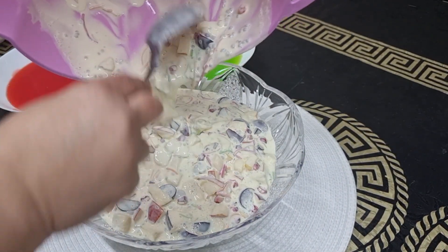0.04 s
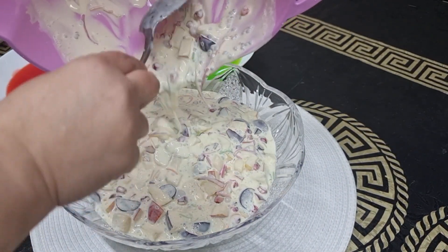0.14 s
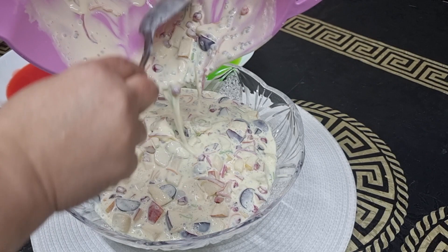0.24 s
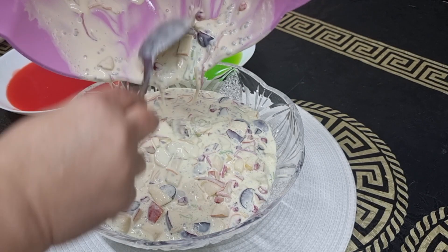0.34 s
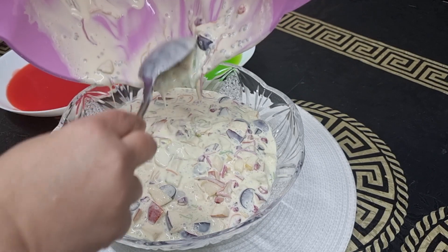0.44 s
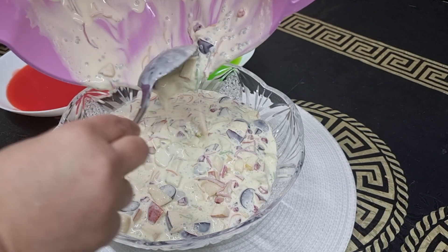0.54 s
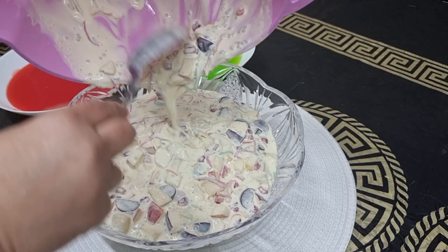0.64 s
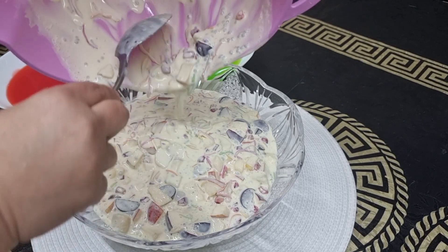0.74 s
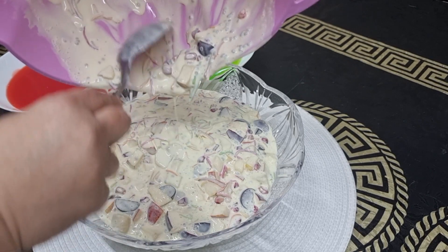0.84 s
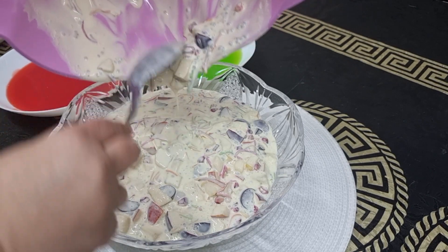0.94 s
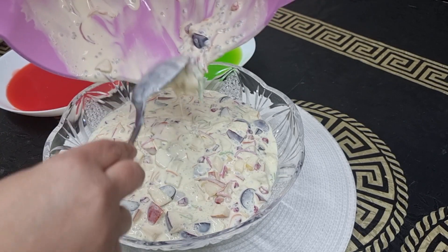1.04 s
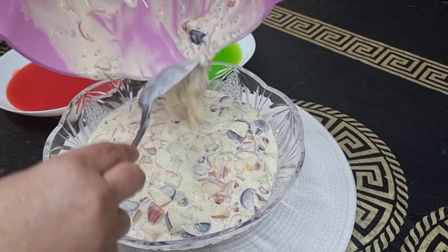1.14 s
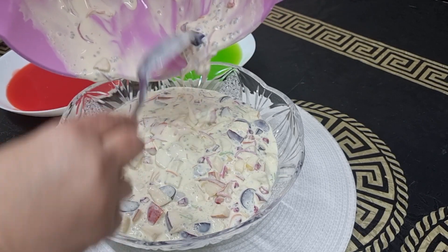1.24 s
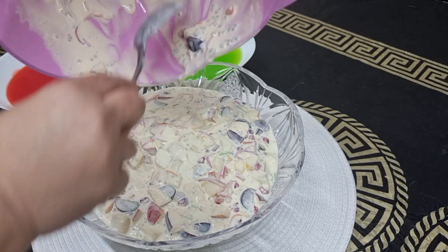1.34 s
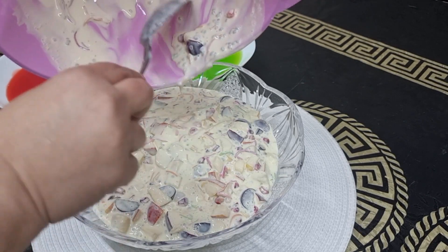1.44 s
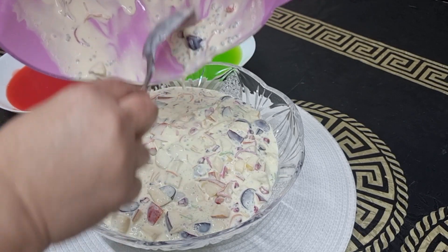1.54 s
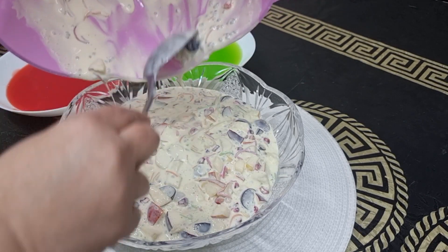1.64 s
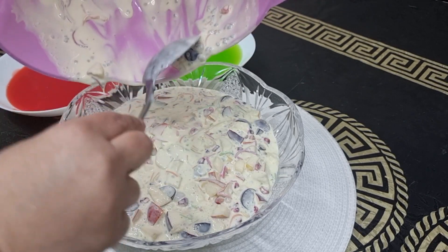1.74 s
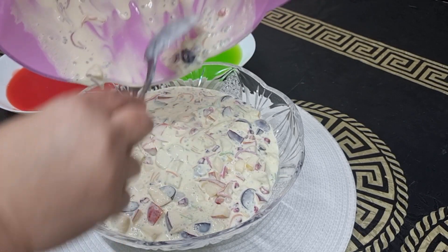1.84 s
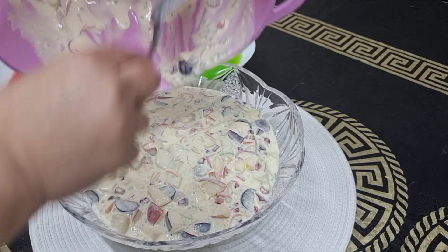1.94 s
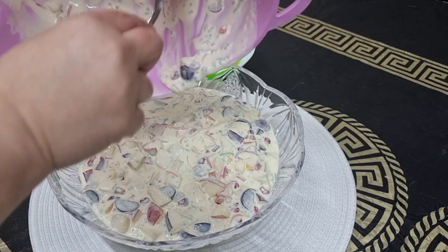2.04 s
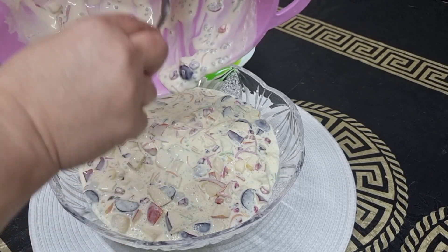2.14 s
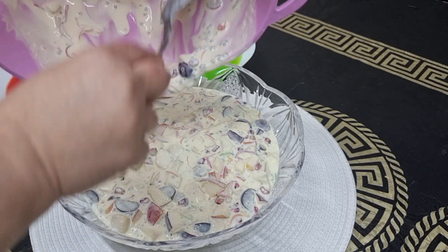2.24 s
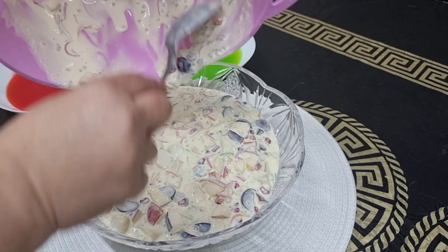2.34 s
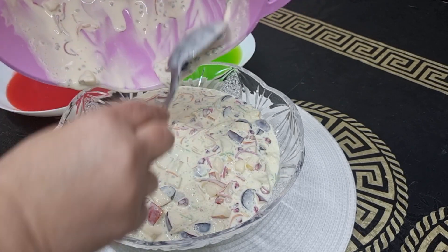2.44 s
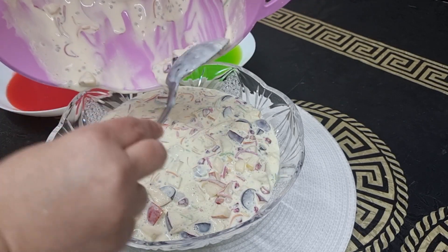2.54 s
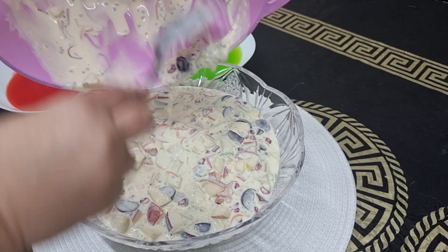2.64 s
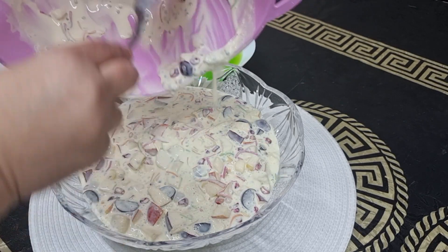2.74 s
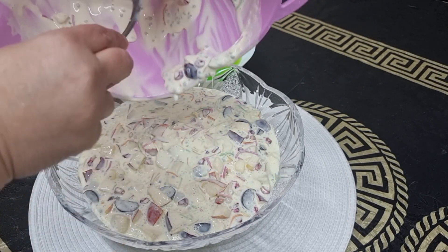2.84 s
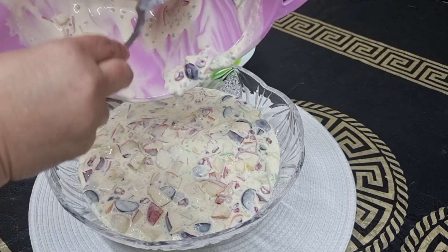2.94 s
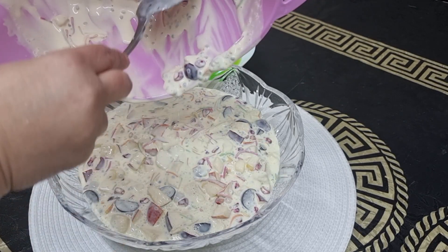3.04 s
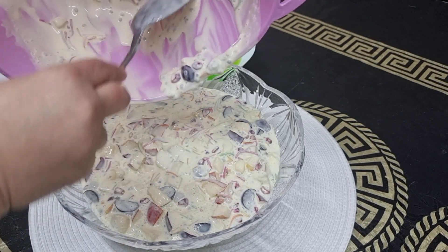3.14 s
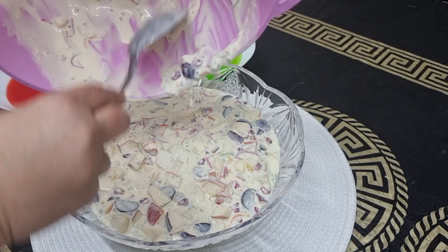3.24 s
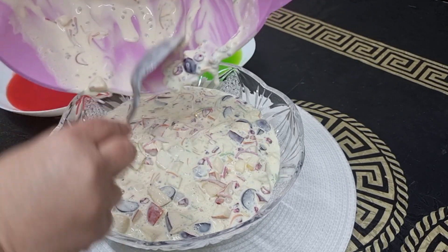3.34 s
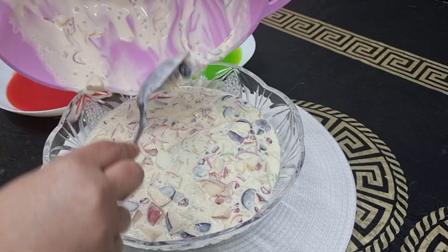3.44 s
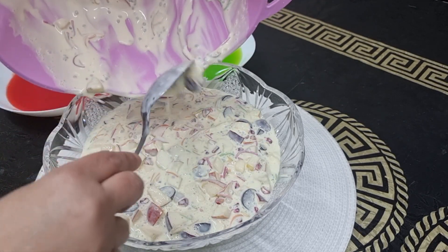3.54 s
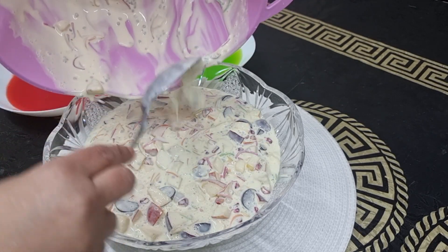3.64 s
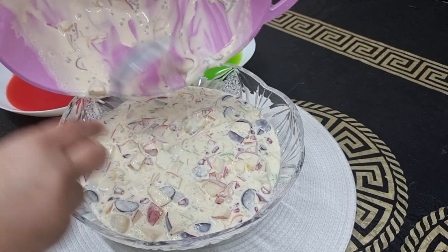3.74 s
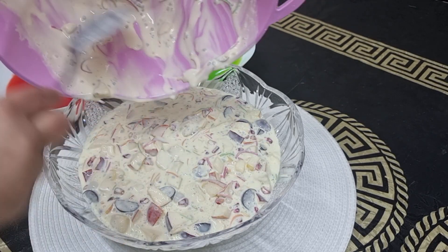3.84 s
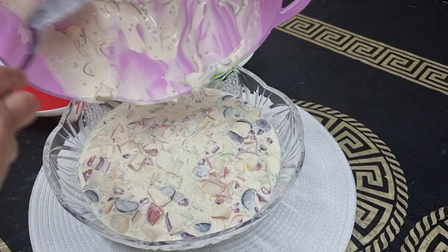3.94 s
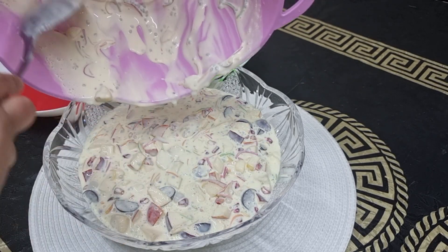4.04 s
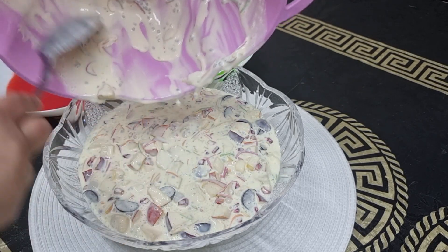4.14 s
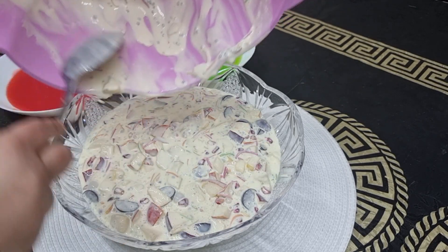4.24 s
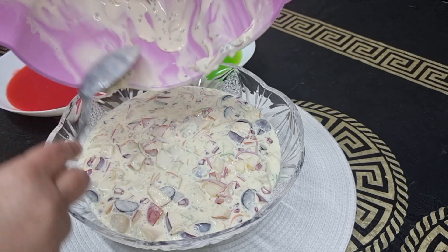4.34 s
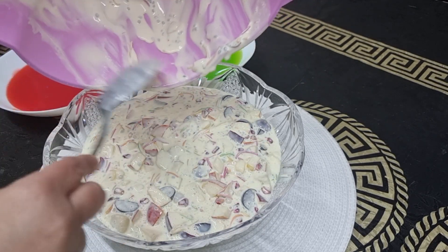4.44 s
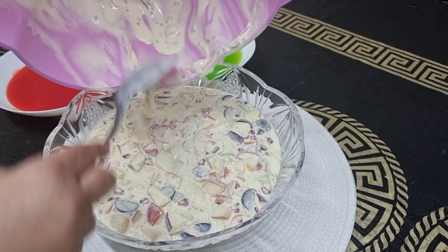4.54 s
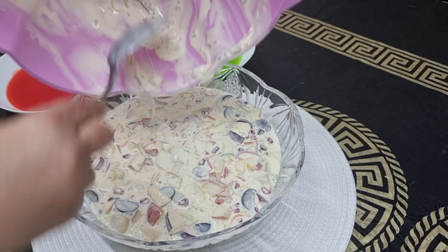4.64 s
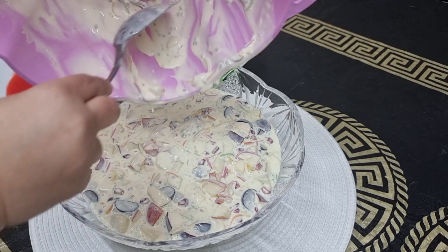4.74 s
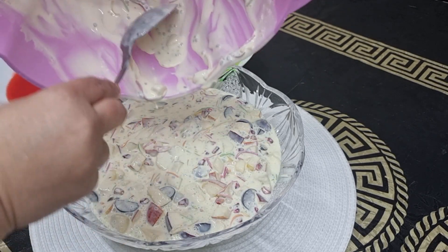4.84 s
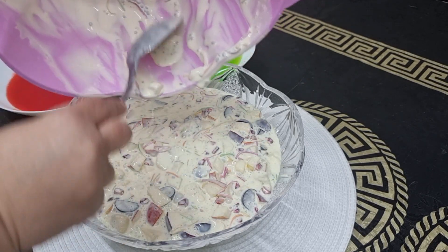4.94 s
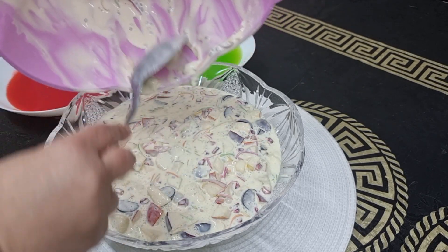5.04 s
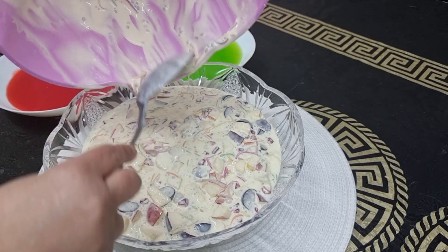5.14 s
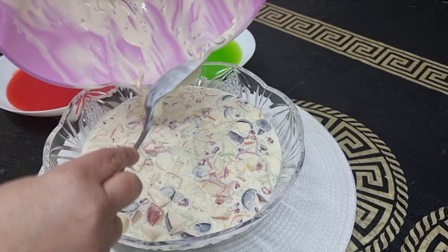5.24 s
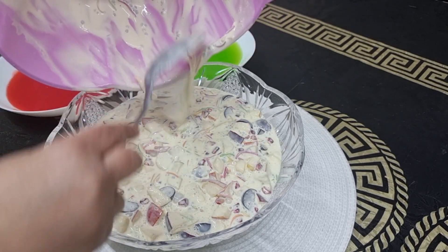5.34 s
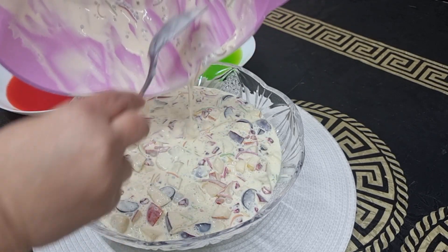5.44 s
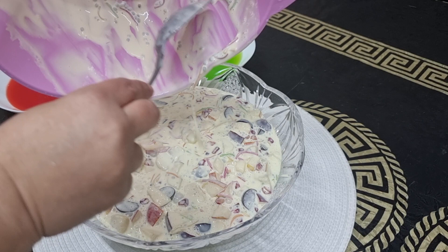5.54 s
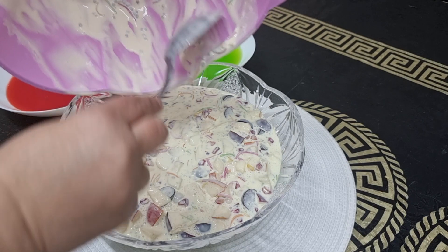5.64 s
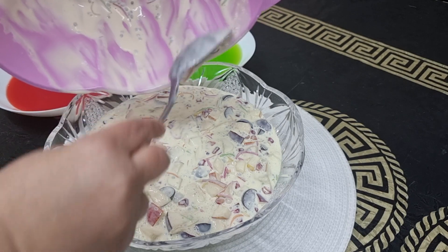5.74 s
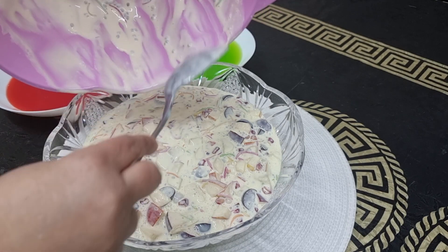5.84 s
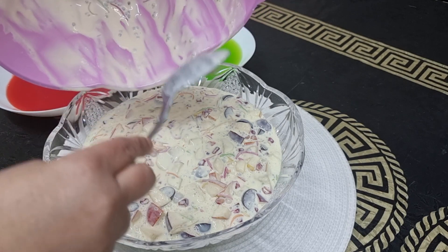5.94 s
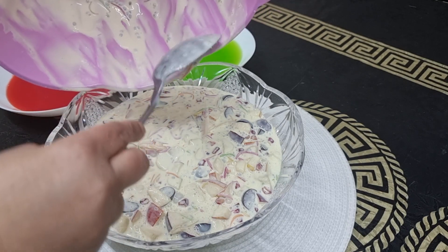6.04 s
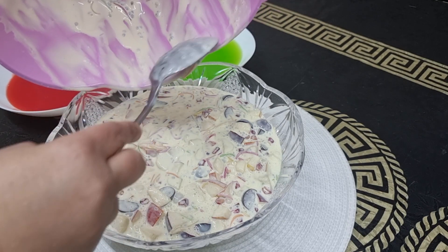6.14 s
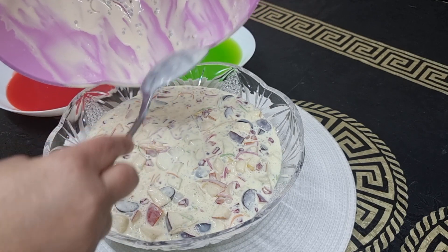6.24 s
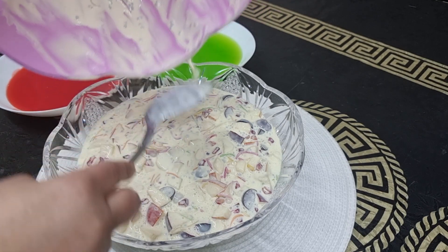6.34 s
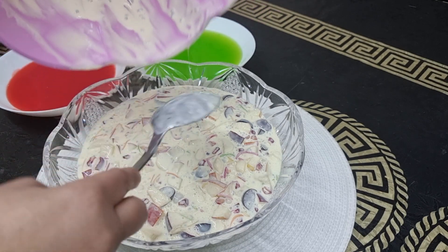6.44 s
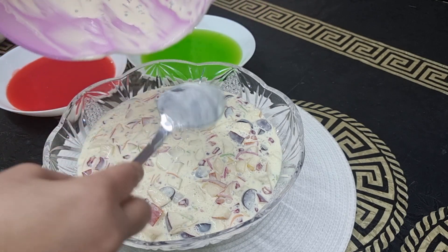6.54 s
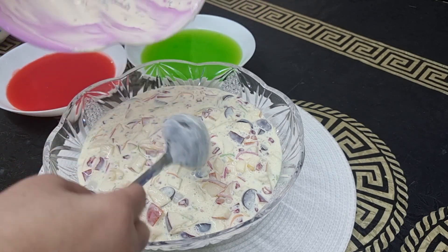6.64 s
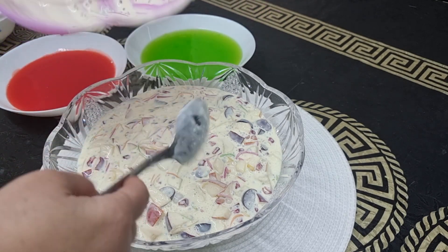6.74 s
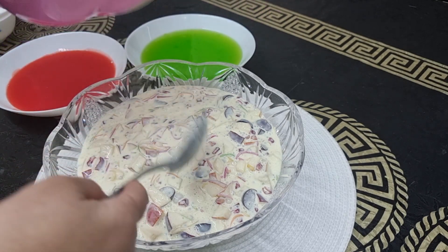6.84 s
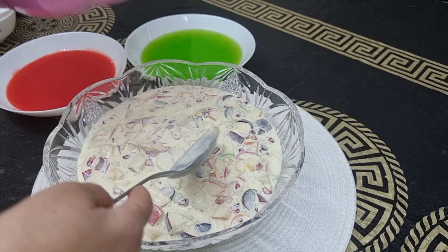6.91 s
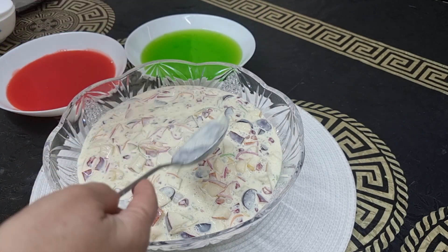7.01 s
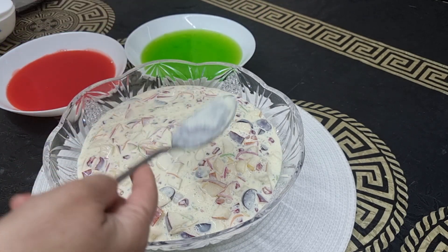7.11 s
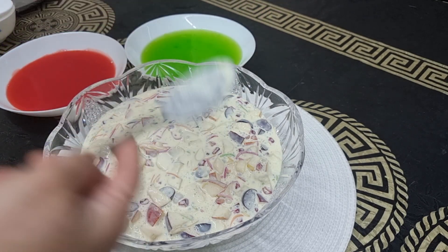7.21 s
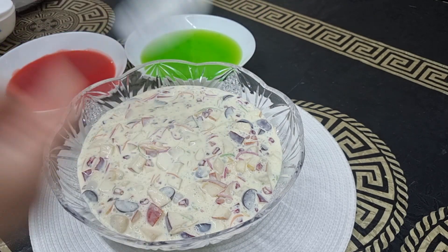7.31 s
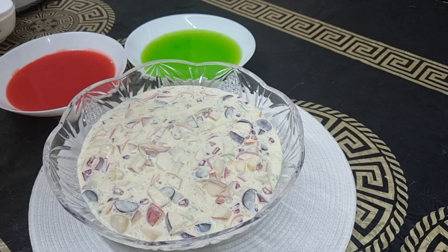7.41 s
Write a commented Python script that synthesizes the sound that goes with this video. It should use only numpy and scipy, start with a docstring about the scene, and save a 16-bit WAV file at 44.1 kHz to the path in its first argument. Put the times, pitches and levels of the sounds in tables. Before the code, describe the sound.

A metal spoon scrapes out a cream-coated plastic bowl, close up in a small kitchen with short reflections and a faint low hum. A dull, low knock at 0.1 s is followed by soft wet drags. Hollower taps come at 0.8 and 1.4 s, with little creamy snaps and a faint scrape. At 2.0 s a sharp click and a quick second tap, then slick rubbing; another stronger pair at 2.8 s. Quiet smears and a small rasp fill 3.1 to 3.7 s. The hardest, brightest crack lands at 3.96 s with a brief steel ring, then crackly scraping and catches until 4.45 s. A full, hollow knock at 4.7 s, soft drags, a weak muffled touch and firmer rub at 5.5 s, and a last knock at 6.1 s with a tiny rasp. Then near quiet, one very faint dull squelch at 7.05 s, and room tone until about 7.5 s.

```python
"""A metal spoon scoops creamy fruit salad out of a plastic bowl in a small kitchen.
Its knocks click and set off damped modes of the wall, dull where cream cushions it and sharp where it is bare.
Between knocks it drags wetly over the plastic, as showers of micro-slips, with small snaps and rasps.
Near the end it pats the salad with one soft squelch of filtered grains.
Echoes, a short tail, shaped room noise and a wavering two-tone hum make up the kitchen."""
import sys
import numpy as np
from scipy import signal
from scipy.fft import rfft, irfft, next_fast_len
from scipy.io import wavfile
from scipy.ndimage import uniform_filter1d

SR = 44100
rng = np.random.default_rng(int(sys.argv[2]) if len(sys.argv) > 2 else 0)


def output_pcm(signal):
    """Save a mono or channel-first signal as 16-bit PCM at the path in sys.argv[1].

    Samples are clipped to [-1, 1] before scaling.
    """
    pcm = np.clip(np.atleast_2d(signal).T, -1, 1) * 32767
    wavfile.write(sys.argv[1], SR, np.round(pcm).astype(np.int16))


N = 329427

# All source levels are fader settings, before any trims in the functions, the room and the final filters.

# The spoon lands on the wall; grip and load retune the bowl's two strongest rings each time.
# Each row: start in seconds, click level in dB, clatter level in dB, centre of the clatter in Hz,
# thump level in dB, low ring in Hz and its level in dB, high ring in Hz and its level in dB,
# 60 dB decay of the low ring in seconds.
KNOCK_EVENTS = [ (0.1271, -23.5, -31, 560, -20.5, 197, -22.5, 358.4, -14.5, 0.056),
                (0.782, -24, -24, 850, -53, 248, -20, 605, -14.5, 0.12),
                (1.423, -18.5, -25, 1020, -30, 251, -31, 581, -23.5, 0.11),
                (2.0041, -7.5, -30.5, 880, -15.5, 395, -22.5, 835, -23.5, 0.046),
                (2.0679, -19.5, -37, 1104, -25.5, 204, -31.5, 260, -28, .06),
                (2.7786, -7, -20, 1256, -16, 253, -26, 395, -17, 0.066),
                (2.8751, -13.5, -24.5, 1046, -21, 241, -19, 395, -23.5, 0.055),
                (3.961, -15.5, -16.5, 1270, -21, 957, -5.5, 1148, 8, 0.01),
                (4.732, -16, -21.5, 700, -17.5, 256.1, -13, 395, -11.5, 0.1),
                (5.5402, -39, -28.5, 1110, -29, 601, -31.5, 1072, -29, 0.0706),
                (6.0769, -19.5, -25.5, 903, -43, 270, -25, 429, -19.5, 0.043)]
HIGH_RING_SHARE = 0.65  # the high ring's decay time as a share of the low ring's
# Modes of the plastic wall. Each row: frequency in Hz, level in dB, 60 dB decay in seconds.
WALL_MODES = [(395, -9.5, 0.12), (450, -6.5, 0.017), (533, -2.5, 0.18), (620.5, -3, 0.043),
              (649, -4.5, 0.094), (672, -1, 0.051), (828, 1, 0.035), (970, -9, 0.016), (1126, -2.5, 0.044),
              (1330, -1.5, 0.0051), (1420, -7.5, 0.031), (1536, -7.5, 0.013), (1744, -7.5, .03),
              (2305, -1.5, .025), (3200, -8, .035), (3590, -7.5, 0.086)]
# Colour of the contact click. Each row: frequency in Hz, relative level in dB.
CLICK_COLOUR = [(100, -21.5), (500, -6), (1200, 11), (2000, 5), (3100, 5), (4500, -4.5), (7000, -11),
                (9000, -20.5), (12500, -24), (16000, -25.5)]

# One push of the spoon along the wall. Each row: start in seconds, length in seconds,
# wet hiss level in dB, rub level in dB, easing of the pressure over the push in dB (negative builds up),
# resonance of the spoon's hollow in Hz, resonance of the rubbed wall in Hz.
DRAG_EVENTS = [ (0.228, 0.094, -55.5, -59.5, -0.5, 2560, 344), (0.347, 0.046, -53.5, -76, 15, 2470, 380),
               (0.796, 0.14, -49.5, -62, 15.5, 2960, 650), (0.97, .11, -62.5, -63.5, 1.5, 2900, 700),
               (1.473, .095, -50, -54, 9, 6060, 620), (2.11, 0.16, -60, -60.5, -3, 2720, 400),
               (2.29, 0.18, -55.5, -57, 8.5, 2490, 450), (3.11, .1, -57.5, -55.5, -10, 3000, 684),
               (3.214, .13, -52, -55.5, 8.5, 2400, 660), (3.344, 0.15, -62, -59.5, 11.5, 5000, 450),
               (4.079, 0.24, -52, -50.5, 12.5, 3040, 600), (4.247, 0.061, -52, -54, -2.5, 4600, 900),
               (4.325, .115, -62.5, -55, -4.5, 3500, 327), (4.874, 0.21, -54, -60.5, 5, 2820, 400),
               (5.149, 0.03, -56, -55.5, 1, 3300, 1200), (5.589, 0.076, -54.5, -42, 9, 2490, 895),
               (5.765, 0.029, -68, -51.5, 6.5, 3600, 1000), (6.166, 0.049, -70.5, -53, -0.5, 2800, 900)]
PRESS_S, LIFT_S = 0.014, 0.01  # pressure's rise time, and time constant as the spoon lifts
# Colour of the wet hiss. Each row: frequency in Hz, relative level in dB.
SMEAR_COLOUR = [(500, -19.5), (1200, -12), (1900, -1), (2600, 3), (3300, -1), (4500, -2.5), (7000, -8),
                (8800, -23.5), (11000, -23), (13000, -19), (16000, -22)]
# Colour of the rubbed wall. Each row: frequency in Hz, relative level in dB.
RUB_COLOUR = [(120, -21), (260, 8.5), (400, -0.5), (620, 5), (850, -4), (1150, -0.5), (1600, -8.5),
              (3000, -13), (8000, -54)]

# The spoon catches on fruit or the rim.
# Each row: start in seconds, wet snap level in dB, level of the wall's knock in dB.
CATCH_EVENTS = [ (0.8315, -32, -64), (0.916, -34, -48), (0.987, -49, -67), (1.06, -54, -53),
                (2.237, -58, -41), (2.3349, -37, -59), (3.195, -33, -67), (3.656, -46, -68),
                (4.098, -42, -41), (4.1454, -32, -60), (4.197, -33, -36.5), (4.424, -34.5, -38),
                (4.885, -44, -41), (5.055, -35.5, -57), (5.6085, -59, -33), (5.6543, -36.5, -44.5),
                (6.2268, -48, -43.5)]
CATCH_S = 0.003  # time constant of one snap
# The spoon's edge judders over the rim.
# Each row: start in seconds, level in dB, length in seconds, pitch of the rasp in Hz.
RASP_EVENTS = [(1.058, -57.5, 0.015, 1850), (3.181, -49.5, 0.034, 2130), (4.257, -58.5, 0.054, 4640),
               (5.149, -51, 0.023, 1850), (5.756, -56.5, 0.057, 2040), (6.188, -46.5, 0.034, 2140)]
# The spoon rings as it strikes or slips free.
# Each row: start in seconds, frequency in Hz, level in dB, 60 dB decay in seconds.
SPOON_RINGS = [(2.7812, 3390, -28.5, 0.012), (3.961, 2950, -12.5, 0.009), (3.9641, 1607, -22.5, 0.1),
               (4.259, 4130, -47.5, 0.054), (4.4265, 2850, -41.5, 0.057), (4.735, 3200, -23.5, 0.0059),
               (6.0766, 2984, -26.5, 0.01), (6.079, 1473, -19.5, 0.011)]
# Colour of the spoon patting the salad. Each row: frequency in Hz, relative level in dB.
PAT_SPECTRUM = [(100, -33), (290, 5.5), (450, -2), (700, -10), (1500, -24.5), (4000, -51.5), (12000, -65.5)]

# How much later the right port hears the bowl. Each row: frequency in Hz, lag in seconds.
RIGHT_LAG = [(120, 0.0018), (280, 0.0002), (600, 0.00052), (1100, 0.00022), (8000, .00027)]
# How much louder the left port hears the bowl. Each row: frequency in Hz, left over right in dB.
LEFT_BALANCE = [(100, -3), (330, 6), (700, 1), (1300, 0), (2800, 0.5), (5500, -3), (10000, 3.5)]
# First echoes from the table and bowls. Each row: delay in seconds, left gain, right gain.
NEAR_ECHOES = [(.0022, .15, .1), (0.01, -.12, .12), (0.0192, .2, -.1), (0.0294, .1, .13)]
# Decay of the kitchen's tail. Each row: frequency in Hz, 60 dB decay in seconds.
TAIL_T60 = [(100, 0.15), (300, 0.33), (1000, 0.3568), (3000, 0.3464), (7000, 0.45), (14000, 0.55)]
# Colour of the kitchen's tail. Each row: frequency in Hz, relative level in dB.
TAIL_COLOUR = [(60, -10), (250, -1), (600, -7.5), (1200, -5.5), (3000, -5), (7000, -6.5), (14000, -7.5)]

# Colour of the kitchen's still air. Each row: frequency in Hz, relative density in dB per Hz.
AIR_COLOUR = [(15, -32), (25, -16.5), (53, -0.5), (157, -8.5), (180, -19), (242, -5.5), (263, -26),
              (309, -15.5), (394, -27.5), (624, -20), (734, -24.5), (1020, -25), (2220, -41.5), (3820, -43),
              (16000, -61.5)]
AIR_DB = -63.5  # rms of the air's mid signal before its swell
# Width of the air. Each row: frequency in Hz, side over mid in dB.
AIR_SIDE = [(60, -9.5), (110, -10.5), (200, -12.5), (380, 4), (700, 3), (1290, 7), (2380, -2), (4400, 2),
            (8120, -3), (15000, -3)]
# The air swells a little over time. Each row: time in seconds, gain in dB.
AIR_GAIN = [(0, -2), (6.3, 2), (6.6, 1), (7.05, 1), (7.25, 3.5), (7.47, 3)]
# Hum of an appliance. Each row: frequency in Hz, rms level in dB.
HUM_TONES = [(70, -72), (184, -72.5)]
EDGE_HZ = 16000  # upper band limit


def knocks(click_s=0.0027, first_touch=0.5, click_db=7, octaves=1.0,
           flex_s=0.003, thump_hz=138, thump_t60=0.027, swell_s=0.001):
    """Steel clicks on plastic, the wall clatters, then the whole loaded bowl flexes and rings."""
    out, clicks = np.zeros((2, N)), np.zeros((2, N))
    t = np.arange(SR // 5) / SR
    modes = wall_modes(t)
    for s, click, clatter, centre_hz, thump, low_hz, low_db, high_hz, high_db, t60 in KNOCK_EVENTS:
        clattering = amp(clatter) * favour(centre_hz, octaves) @ modes
        rings = ring(t, low_hz, low_db, t60) + ring(t, high_hz, high_db, HIGH_RING_SHARE * t60)
        body = clattering + rings * (1 - np.exp(-t / swell_s))
        thud = ring(t - flex_s, thump_hz, thump, thump_t60)
        add(out, s, body + thud)
        contact = chatter(t, click_s) + first_touch * (t == 0)
        add(clicks, s, amp(click + click_db) * contact)
    return out + colour(clicks, CLICK_COLOUR)


def wall_modes(t):
    """Each mode of the wall as a row; neighbours swing in opposite directions."""
    return np.array([(-1) ** k * ring(t, *mode) for k, mode in enumerate(WALL_MODES)])


def favour(centre_hz, octaves):
    """The place and softness of a contact favour the modes near one pitch."""
    distance = np.log2(np.array(WALL_MODES)[:, 0] / centre_hz)
    return np.exp(-distance ** 2 / octaves ** 2)


def chatter(t, length):
    """A decaying noise burst of tiny contacts with unit energy; length is its time constant."""
    burst = rng.standard_normal((2, len(t))) * np.exp(-t / length)
    return burst / np.linalg.norm(burst, axis=1, keepdims=True)


def scrapes(hiss_db=-1, rub_db=2.5):
    """Cream crackles under the dragging spoon while stick and slip rub the wall."""
    out = np.zeros((2, N))
    t = np.arange(SR // 3) / SR
    for s, length, wet, rub, ease_db, hollow_hz, wall_hz in DRAG_EVENTS:
        crackle = colour(grains(len(t), per_s=1400, spread_db=1.5), SMEAR_COLOUR)
        crackle = shifting(crackle, hollow_hz, peak_db=4.5, patchy_db=5)
        rubbing = colour(grains(len(t), per_s=400, spread_db=3.0), RUB_COLOUR)
        rubbing = shifting(rubbing, wall_hz, peak_db=7, patchy_db=5.5)
        grip = pressure(t, length, ease_db) * stick_slip(len(t), slip_s=0.004, uneven_db=1.5)
        add(out, s, grip * (amp(wet + hiss_db) * crackle + amp(rub + rub_db) * rubbing))
    return out


def grains(size, per_s, spread_db):
    """Micro-slips at random moments, most small and a few large, scaled to rms 1."""
    sizes = amp(spread_db * np.minimum(rng.exponential(1, size), 4))
    slips = sizes * (rng.random(size) < per_s / SR)
    return unit(slips * rng.standard_normal((2, size)))


def shifting(x, peak_hz, peak_db, patchy_db, octaves=0.56):
    """One broad band is lifted or dipped while patches of the wall come and go under the moving spoon."""
    hz, _, z = signal.stft(x, SR, nperseg=512)
    patches = rng.standard_normal(z.shape[1:])
    patches = uniform_filter1d(patches, size=3, axis=0)  # smooth over frequency
    patches = unit(uniform_filter1d(patches, size=9, axis=1))  # smooth over time
    peak = np.exp(-(np.log2((hz[:, None] + 1) / peak_hz) / octaves) ** 2)
    shaped = signal.istft(z * amp(patchy_db * patches + peak_db * peak), SR)[1]
    return unit(shaped[:, :x.shape[1]])


def pressure(t, length, ease_db):
    """The spoon presses in, eases off (or builds up, if ease_db is negative) and lifts away."""
    held = amp(-ease_db * np.minimum(t / length, 1))
    lift = np.exp(-np.maximum(t - length, 0) / LIFT_S)
    return np.minimum(t / PRESS_S, 1) * held * lift


def stick_slip(size, slip_s, uneven_db):
    """The grip on the plastic comes and goes at random, with a new target every slip_s."""
    t = np.arange(size) / SR
    return amp(uneven_db * np.interp(t / slip_s, np.arange(200), rng.standard_normal(200)))


def catches(snap_db=6, wall_db=-2, centre_hz=700, octaves=0.8):
    """Small slips of the spoon: cream snaps and the wall answers."""
    out, snaps = np.zeros((2, N)), np.zeros((2, N))
    t = np.arange(SR // 10) / SR
    answer = favour(centre_hz, octaves) @ wall_modes(t)
    for s, snap, knock in CATCH_EVENTS:
        add(snaps, s, amp(snap + snap_db) * chatter(t, CATCH_S))
        add(out, s, amp(knock + wall_db) * answer)
    return out + colour(snaps, SMEAR_COLOUR)


def rasps(slips_per_s=420, octaves=0.51, patchy_db=4):
    """Quick uneven slips, heard through one broad resonance of the rim."""
    out = np.zeros((2, N))
    t = np.arange(SR // 8) / SR
    for s, db, length, hz in RASP_EVENTS:
        pace = rng.exponential(1, len(t) // 64 + 1).repeat(64)[:len(t)]  # redrawn every 64 samples
        turns = np.cumsum(slips_per_s * pace) / SR
        slips = np.exp(-4 * (turns % 1)) * rng.standard_normal((2, len(t)))
        band = [(f, -10 * np.log10(1 + (np.log2(f / hz) / octaves) ** 6))
                for f in np.geomspace(100, 16000, 24)]
        rasp = shifting(colour(slips, band), hz, peak_db=-1.5, patchy_db=patchy_db)
        arch = np.sqrt(np.sin(np.pi * np.minimum(t / length, 1)).clip(0))
        add(out, s, amp(db) * rasp * arch)
    return out


def spoon():
    """Short ring of the steel as damped sines, stifled by the hand."""
    out = np.zeros((2, N))
    t = np.arange(SR // 2) / SR
    for s, hz, db, t60 in SPOON_RINGS:
        add(out, s, ring(t, hz, db, t60))
    return out


def pat(start_s=7.052, length_s=0.082, pat_db=-51, ease_db=9):
    """A soft, dull squelch of grains in the salad, shaped by the spoon's pressure."""
    out = np.zeros((2, N))
    t = np.arange(SR // 4) / SR
    squelch = colour(grains(len(t), per_s=600, spread_db=1.5), PAT_SPECTRUM)
    add(out, start_s, amp(pat_db) * pressure(t, length_s, ease_db) * squelch)
    return out


def ports(x):
    """Sound bends round to the right microphone port: later, most in the bass, with a balance set by pitch."""
    size = next_fast_len(N, True)
    hz = np.fft.rfftfreq(size, 1 / SR)
    lean = amp(read(LEFT_BALANCE, hz) / 2)  # half the difference on each side
    late = np.exp(-2j * np.pi * hz * read(RIGHT_LAG, hz))
    return irfft(rfft(x, size) * np.array([lean, late / lean]), size)[:, :N]


def kitchen(x, tail_db=-2, gap_s=0.0073, mono_hz=350):
    """A few near echoes and a short diffuse tail whose bass is alike at both ports."""
    count = SR // 2
    taps = rng.choice([-1., 1.], (2, count)) * (rng.random((2, count)) < 4000 / SR)  # sparse reflections
    hz, t, z = signal.stft(taps, SR, nperseg=256)
    same = np.exp(-(hz[:, None] / mono_hz) ** 2 / 2)
    z = np.array([z[0], same * z[0] + np.sqrt(1 - same ** 2) * z[1]])
    t60 = read(TAIL_T60, hz)[:, None]
    decay = np.exp(-np.log(1000) * t / t60)
    z = z * decay * amp(read(TAIL_COLOUR, hz))[:, None] / np.sqrt(t60)  # energy independent of t60
    tail = signal.istft(z, SR)[1][:, :count]
    tail = tail / np.sqrt(np.mean(taps ** 2) * SR / np.log(10 ** 6))
    response = np.zeros((2, SR))
    add(response, gap_s, amp(tail_db) * tail)
    for s, left, right in NEAR_ECHOES:
        add(response, s, np.array([[left], [right]]))
    return x + signal.fftconvolve(x, response, axes=1)[:, :N]


def air(waver=0.92):
    """Low room rumble and faint wide hiss from shaped noise, plus a hum whose phase wavers (radians)."""
    size = next_fast_len(N, True)
    hz, t = np.fft.rfftfreq(size, 1 / SR), np.arange(N) / SR
    z = rfft(rng.standard_normal((2, size))) * amp(read(AIR_COLOUR, hz))
    mid, side = irfft(z * [np.ones(len(hz)), amp(read(AIR_SIDE, hz))], size)[:, :N]
    noise = np.array([mid + side, mid - side]) / mid.std()
    drift = np.interp(t, np.linspace(0, t[-1], 64), rng.standard_normal(64))
    hum = sum(amp(db) * np.sqrt(2) * np.sin(2 * np.pi * f * t + waver * drift) for f, db in HUM_TONES)
    return amp(AIR_DB) * level(*np.transpose(AIR_GAIN)) * noise + hum


def amp(db):
    """Decibels to gain."""
    return 10 ** (np.asarray(db) / 20)


def unit(x):
    """Scales to rms 1."""
    return x / np.sqrt(np.mean(x ** 2) + 1e-20)


def read(points, hz):
    """Reads a table on a log-frequency axis."""
    f, value = np.transpose(points)
    return np.interp(np.log(hz + 1), np.log(f), value)


def add(mix, s, sound):
    """Mixes a sound in at time s."""
    part = mix[:, round(s * SR):][:, :sound.shape[-1]]
    part += sound[..., :part.shape[1]]


def colour(x, points, size=4096):
    """Causal minimum-phase filter of unit energy with the given spectrum."""
    log_gain = np.log(amp(read(points, abs(np.fft.fftfreq(size, 1 / SR)))))
    taps = np.fft.ifft(np.exp(np.conj(signal.hilbert(log_gain)))).real[:size // 2]
    return signal.oaconvolve(x, taps[None] / np.linalg.norm(taps), axes=1)[:, :x.shape[1]]


def level(s, db):
    """Gain over the whole scene from a dB curve, silent outside it."""
    steps = np.arange(0, N, 64)
    gains = amp(np.interp(steps / SR, s, db, left=-200, right=-200))
    return np.interp(np.arange(N), steps, gains)


def ring(t, hz, db, t60):
    """A damped mode that starts at t = 0."""
    t = np.maximum(t, 0)
    return amp(db) * np.exp(-np.log(1000) * t / t60) * np.sin(2 * np.pi * hz * t)


def scene(knock_db=1.5, drag_db=-1.0):
    """Spoon and bowl in the kitchen."""
    bowl = amp(knock_db) * knocks() + catches() + amp(drag_db) * scrapes() + rasps() + spoon()
    return kitchen(ports(bowl + pat())) + air()


def record(dry, low_cut_hz=58):
    """Bass roll-off, full-scale limit and band limit."""
    lean = signal.sosfilt(signal.butter(4, low_cut_hz, "high", fs=SR, output="sos"), dry)
    taps = signal.firwin(401, EDGE_HZ, window=("kaiser", 8), fs=SR)
    return signal.oaconvolve(np.clip(lean, -1, 1), taps[None], "same", axes=1)


dry = scene()
out = record(dry)
output_pcm(out)
```